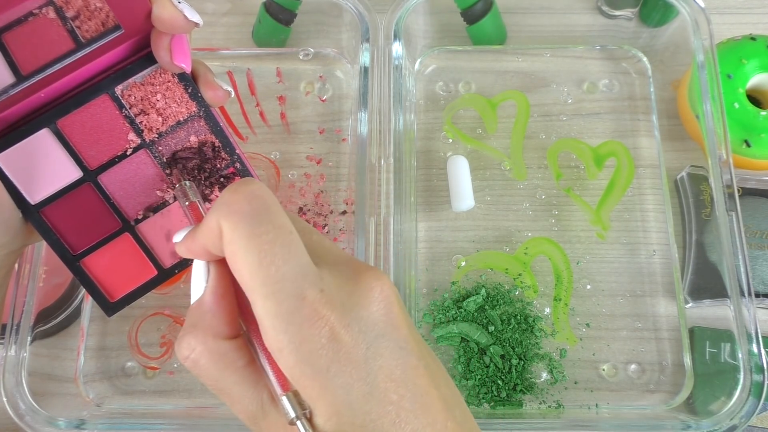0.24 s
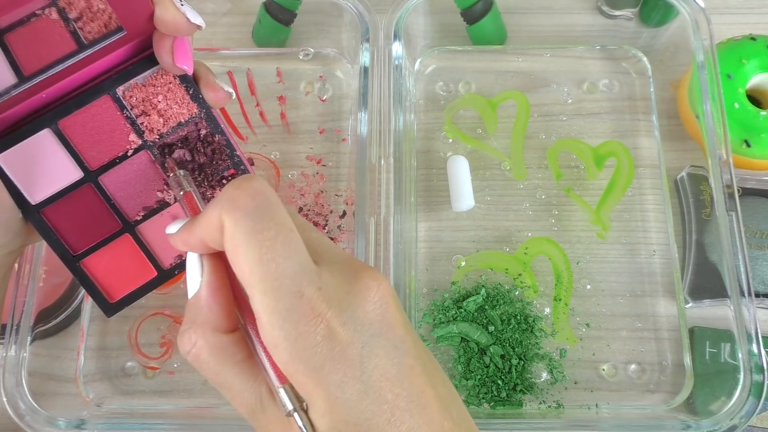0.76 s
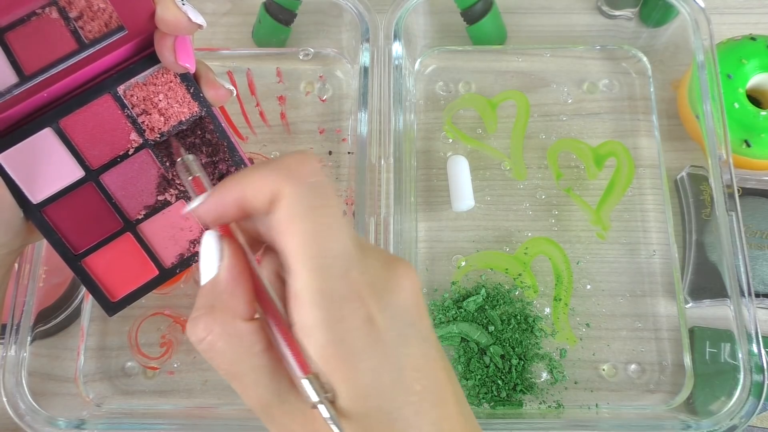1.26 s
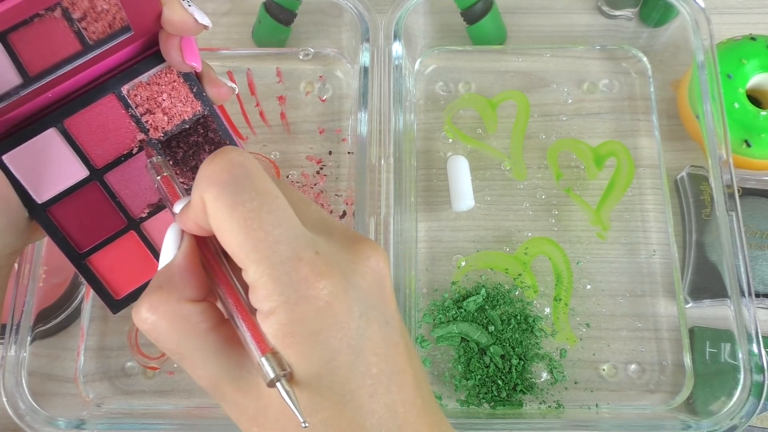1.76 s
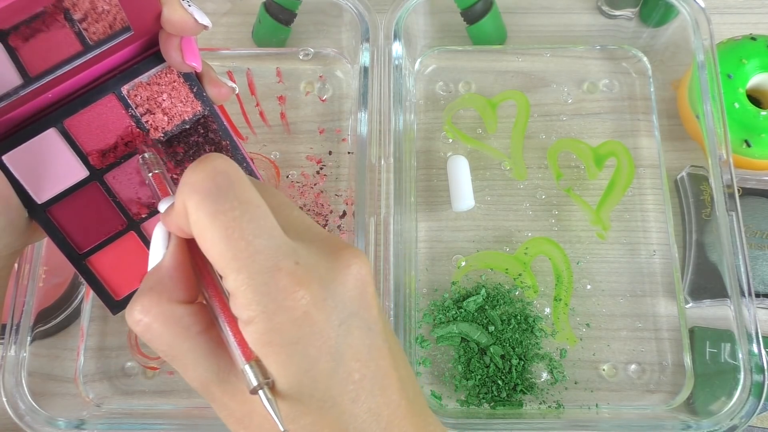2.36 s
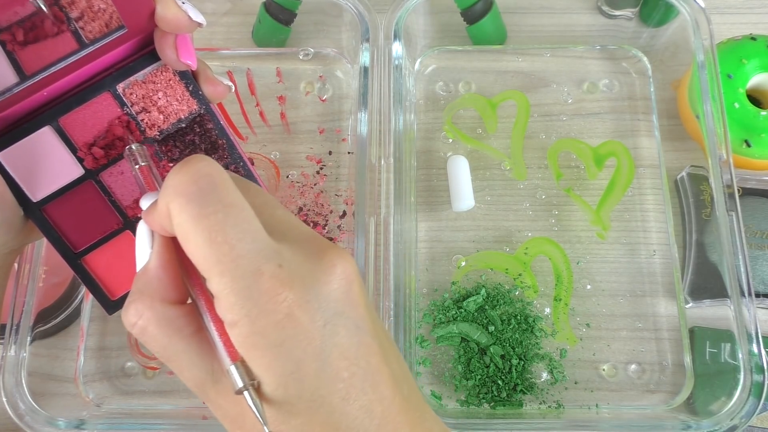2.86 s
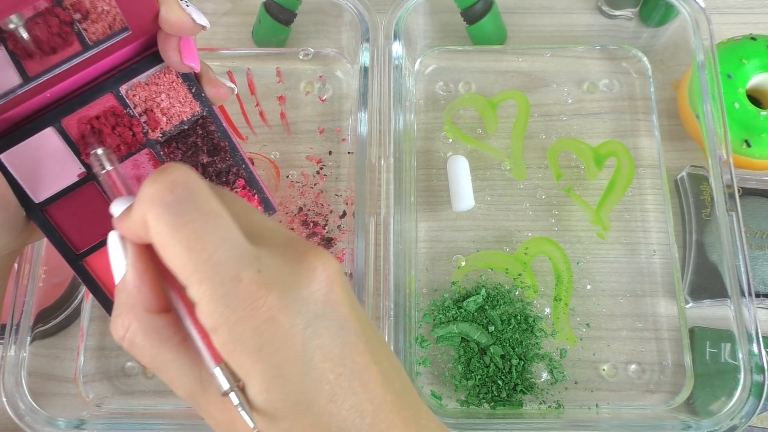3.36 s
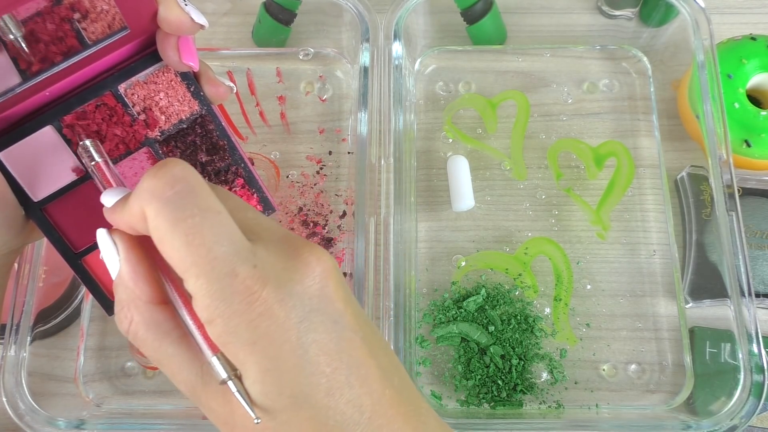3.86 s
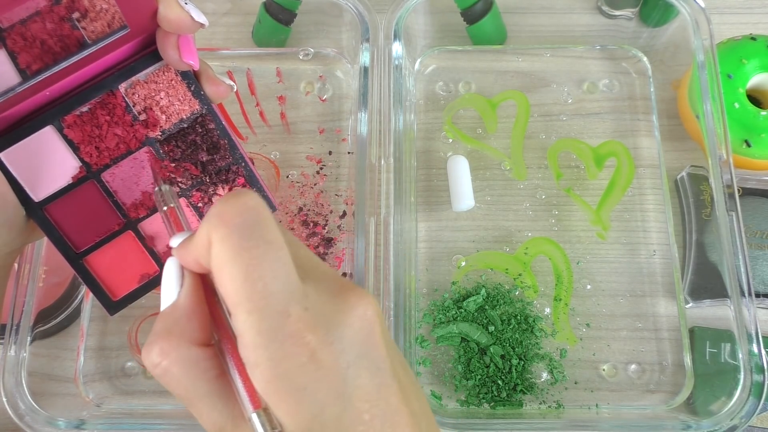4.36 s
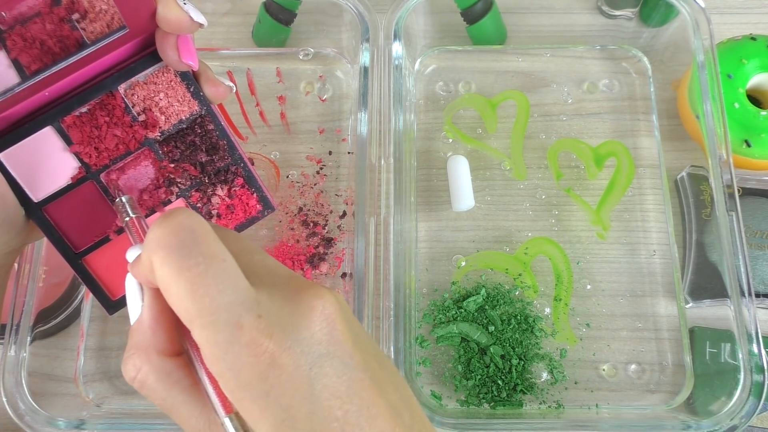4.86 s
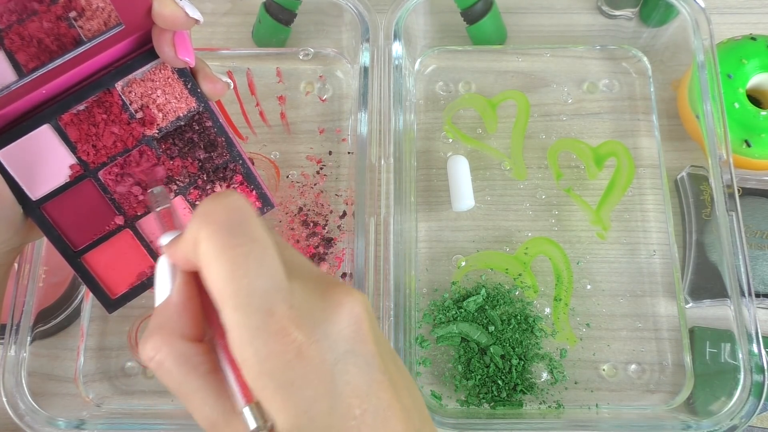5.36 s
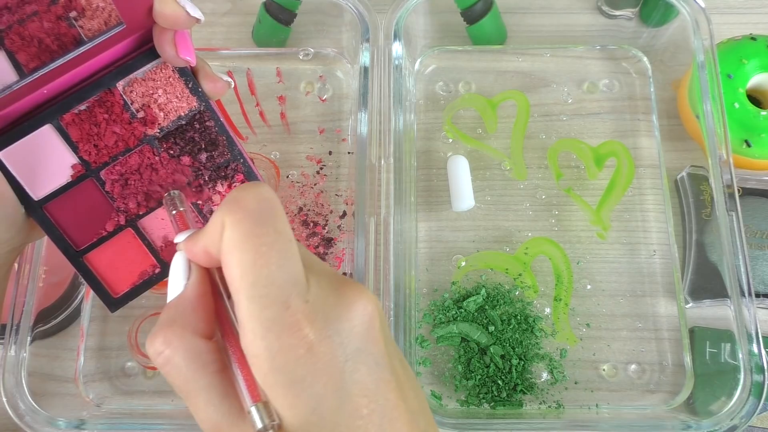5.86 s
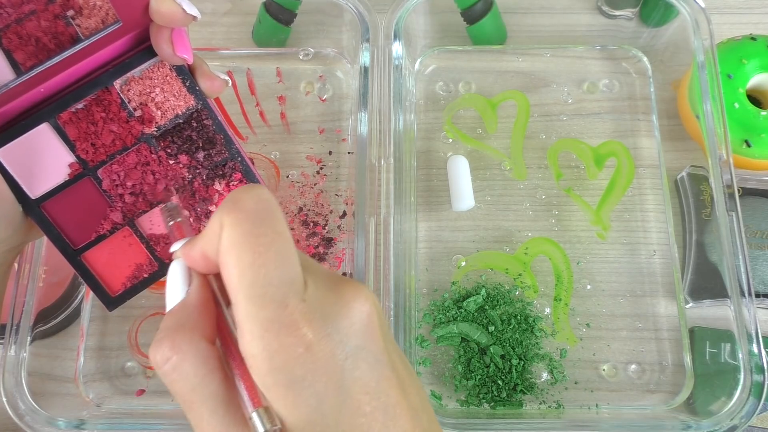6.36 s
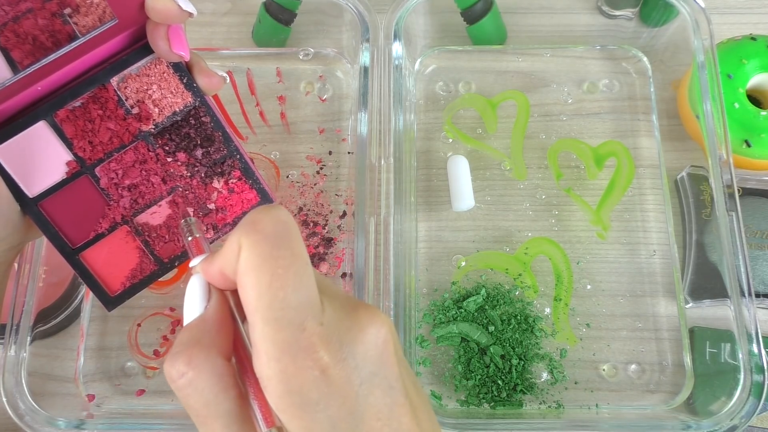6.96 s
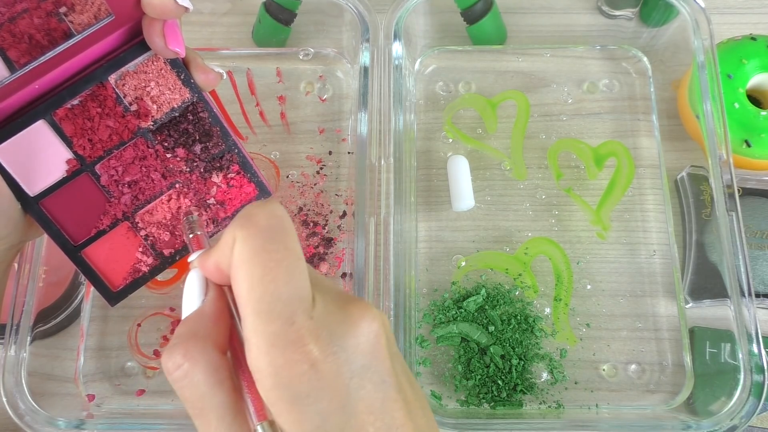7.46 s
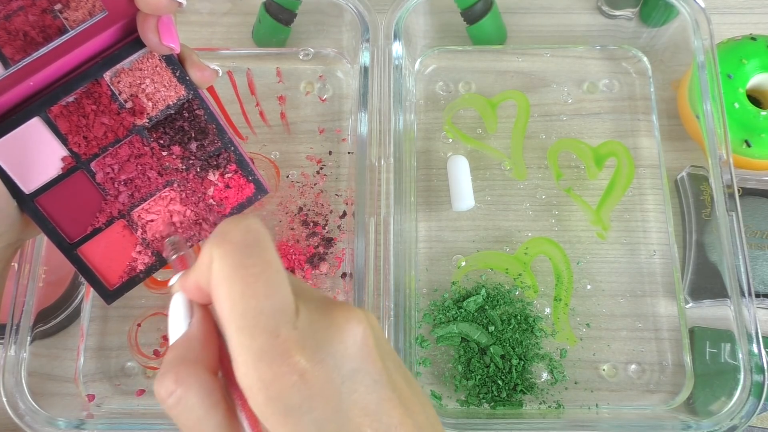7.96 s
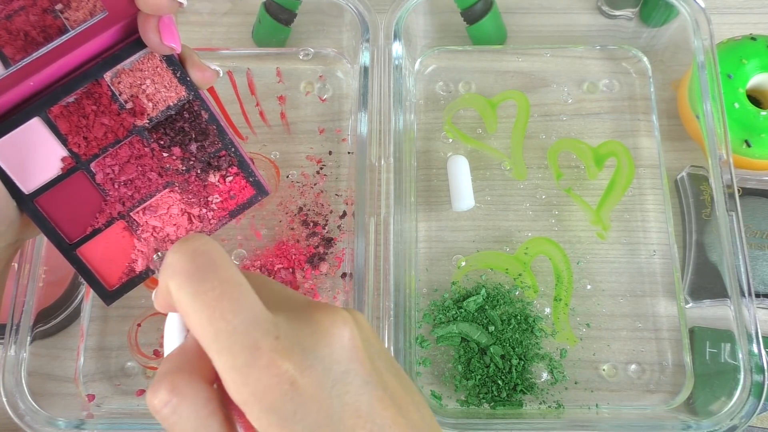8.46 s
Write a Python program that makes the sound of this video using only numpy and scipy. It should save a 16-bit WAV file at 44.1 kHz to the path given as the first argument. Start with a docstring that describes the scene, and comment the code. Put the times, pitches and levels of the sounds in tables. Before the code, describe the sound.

A metal tip scrapes and crumbles pressed powder in a small plastic palette in short gritty strokes, with a few hard taps over faint hum.

```python
"""Under the whole take lie faint hiss and a wavering hum, made of random spectra and resonated noise.
From the first instant a metal tip scrapes powder from a plastic palette held over a glass tray:
random grit, joined from 0.3 s by breaking chips, rings the palette; each push thuds through the table.
Hard taps fall near 1.4, 1.5, 4.1 and 4.3 s; the tip moves to new pans at 1.95, 4.6 and 7.05 s.
A stereo microphone stands close by; tray and hands return short reflections, the room a faint tail."""
import sys
import numpy as np
from scipy import signal
from scipy.io import wavfile
from scipy.ndimage import uniform_filter1d

SR = 44100
rng = np.random.default_rng(int(sys.argv[2]) if len(sys.argv) > 2 else 0)


def pcm_store(signal):
    """Save signal as 16-bit PCM."""
    levels = np.round(np.clip(np.atleast_2d(signal), -1, 1) * 32767)
    wavfile.write(sys.argv[1], SR, levels.astype(np.int16).T)


N = 384552
T = np.arange(N) / SR


def gain_of(db):
    """Amplitude factor of a level in dB."""
    return 10 ** (np.asarray(db) / 20)


def evened(x):
    """Scales a signal to rms 1."""
    return x / np.sqrt(np.mean(x ** 2) + 1e-20)


def read(points, hz):
    """Reads a curve between its points along a logarithmic frequency axis."""
    f, value = np.transpose(points)
    return np.interp(np.log(hz + 1), np.log(f + 1), value)


def add(mix, start_s, sound):
    """Adds a sound into the mix in place, cut off at the end of the mix."""
    part = mix[round(start_s * SR):][:len(sound)]
    part += sound[:len(part)]


def ring(x, hz, width):
    """One steep resonance, two equal poles in a row: complex output, its real part at gain 1 at centre."""
    r = np.exp(-np.pi * width / SR)
    pole = r * np.exp(2j * np.pi * hz / SR)
    two_poles = np.convolve([1, -pole], [1, -pole])
    return 2 * (1 - r) ** 2 * signal.lfilter([1], two_poles, x)


def drift(rate_hz):
    """Slow random wander of rms 1: low-passed noise drawn at every 64th sample."""
    b, a = signal.butter(2, rate_hz, fs=SR / 64)
    slow = evened(signal.lfilter(b, a, rng.standard_normal(N // 64 + 1)))
    return np.interp(np.arange(N) / 64, np.arange(len(slow)), slow)


def crack(rise_s, t60_s, crumbs_db):
    """A noise burst of force with a quieter, slower-dying trail of crumbs."""
    t = np.arange(900) / SR
    burst = gain_of(-60 * t / t60_s)
    crumbs = gain_of(crumbs_db - 60 * t / 0.048)
    return rng.standard_normal(len(t)) * (1 - np.exp(-t / rise_s)) * (burst + crumbs)


# spectrum of the background: f/Hz, relative density level/dB per Hz
HISS_SPECTRUM = [(25, -30), (45, -22.5), (70, -7.5), (100, -18), (160, -9), (240, -12.5), (500, -17),
                 (1000, -19), (3000, -19.5), (15700, -24)]
# its balance between the capsules: f/Hz, left-right level/dB
HISS_BALANCE = [(60, -24.5), (240, -2), (950, -0.5), (3770, 0), (15000, 0.5)]
# its likeness between the capsules: f/Hz, correlation (-1 to 1)
HISS_LIKENESS = [(60, -0.38), (380, 0.4), (2380, 0.12), (15000, -0.069)]
HISS_DB = -60.5  # rms over both capsules


def hiss():
    """Room rumble and microphone hiss as random short-time spectra, partly alike at the two capsules."""
    frames, hz = N // 512 + 5, np.fft.rfftfreq(2048, 1 / SR)
    a, b, c, d = rng.standard_normal((frames, 1025, 4)).T
    left, separate = a + 1j * b, c + 1j * d
    same = np.clip(read(HISS_LIKENESS, hz), -1, 1)[:, None]
    right = same * left + np.sqrt(1 - same ** 2) * separate
    level_db = read(HISS_SPECTRUM, hz) + np.outer([.5, -.5], read(HISS_BALANCE, hz))
    spectra = np.array([left, right]) * gain_of(level_db)[:, :, None]
    sound = signal.istft(spectra, nperseg=2048, noverlap=1536)[1][:, :N]
    return gain_of(HISS_DB) * evened(sound)


# fuzzy tones of the machine: f/Hz, width of each pole/Hz, level/dB before swell and capsule gains
HUM_TONES = [(128, 21, -69), (157.7, 11.5, -64.5), (205.6, 13, -77.5), (282.4, 14, -79.5)]
# slow swell of the whole hum: t/s, level/dB
HUM_SWELL = [(0.3, -2.5), (1.2, -0.5), (1.9, -5), (3.0, 5), (4.4, 0), (5.5, -1.5), (7.5, -2)]


def hum():
    """A distant machine: narrow bands of noise waver as tones that swell slowly, louder on the right."""
    out = np.zeros((2, N))
    swell_db = np.interp(T, *np.transpose(HUM_SWELL))
    for hz, width, db in HUM_TONES:
        near, other = (evened(ring(rng.standard_normal(N), hz, width).real) for _ in range(2))
        capsules = np.array([0.2 * near + .5 * other, 1.39 * near])
        out += gain_of(db + swell_db + drift(1.0)) * capsules
    return out


# one row a stroke or short scratch beside a tap or chip:
# start t/s, move to the second pressure t/s, hold t/s (1 ms is added to move and hold),
# landing pressure level/dB, second pressure level/dB,
# scratch of the tip level/dB, hollow ring of the palette level/dB, push into the table level/dB
STROKES = [(0.001, 0.02, 0.0034, -44.5, -45, -12, -3, -0.5),
           (0.198, 0.089, 0.004, -59.5, -49.5, -8.5, 2, 5), (0.471, 0.01, 0.065, -72, -44.5, -8, -2, 3.5),
           (0.696, 0.089, 0.0028, -60.5, -44, -9.5, -2, -1.5),
           (0.908, 0.052, 0.031, -55.5, -40, -14.5, -4, -10),
           (1.169, 0.059, 0.0085, -51.5, -35.5, -15.5, -2.5, -22),
           (1.357, 0.022, 0.004, -54, -45.5, -14, -6.5, -21.5),
           (1.524, 0.0035, 0.05, -54, -74.5, 9, 2, -16), (1.792, 0.008, 0.072, -57, -67, -9, 2.5, 4),
           (2.008, 0.1, 0.12, -69, -51, -6, -1, 1), (2.321, 0.051, 0.02, -57, -47, -4, -2, 1),
           (2.565, 0.066, 0.037, -67, -45, -6.5, 0.5, -4), (2.806, 0.044, 0.0075, -48, -43.5, -4, 1, -0.5),
           (3.017, 0.05, 0.035, -57, -45.5, -4.5, -1, -8), (3.227, 0.051, 0.005, -48.5, -42, -3, 1, -6),
           (3.438, 0.056, 0.0043, -51, -40.5, -6.5, -2, -8),
           (3.617, 0.056, 0.041, -60.5, -41, -5.5, -1.5, -8),
           (3.837, 0.077, 0.0076, -55.5, -35.5, -10, -6, -16),
           (4.048, 0.027, 0.017, -46, -31, -14.5, -4.5, -46),
           (4.282, 0.034, 0.007, -48.5, -42.5, -11, -8, -14),
           (4.734, 0.081, 0.073, -61.5, -65, -9.5, -10, 1.5),
           (4.806, 0.012, 0.071, -68, -48.5, -11.5, -3.5, -3),
           (5.027, 0.033, 0.04, -60, -42, -11.5, -4, -6), (5.237, 0.045, 0.035, -55, -45.5, -7, -2, 0),
           (5.45, 0.041, 0.013, -48, -47, -7, -1, 3), (5.647, 0.044, 0.047, -51.5, -49.5, -5, -3, 6),
           (5.871, 0.019, 0.031, -49.5, -45.5, -4.5, -1, 1), (6.071, 0.048, 0.022, -54.5, -45, -6, -0.5, 3),
           (6.281, 0.03, 0.02, -52.5, -38, -6.5, -3, -5.5),
           (6.487, 0.047, 0.033, -53.5, -39, -10, -6, -7.5),
           (6.692, 0.025, 0.028, -53.5, -36.5, -7, -4, -2),
           (6.825, 0.066, 0.004, -84, -58.5, -7.5, -4.5, 8),
           (7.249, 0.045, 0.01, -47.5, -47, -10.5, 0.5, -3),
           (7.445, 0.033, 0.029, -50.5, -44.5, -9.5, -2.5, 4.5),
           (7.642, 0.069, 0.021, -61, -41.5, -8, -1, 0.5), (7.843, 0.036, 0.033, -59, -38, -7, -4.5, 3.5),
           (8.069, 0.068, 0.004, -45.5, -49.5, -5, -0.5, 6.5),
           (8.252, 0.031, 0.046, -58, -43, -4.5, -3, 3.5), (8.457, 0.033, 0.062, -56.5, -45, -4.5, -3.5, 5),
           (8.652, 0.063, 0.082, -50, -39.5, -5, -5, 2)]
LAND_DB_PER_S, SAG_DB_PER_S, LIFT_DB_PER_S = 2000, 105, 538  # tip comes down, eases while held, lifts off


def pressure():
    """In each row pressure lands, moves to a second level, eases and lifts; loose powder trickles on."""
    press = np.zeros(N)
    for start, move, hold, landing_db, second_db, *_ in STROKES:
        second = start + move + 1e-3
        lift = second + hold + 1e-3
        eased_db = second_db - SAG_DB_PER_S * hold
        times = [start - 1, start, second, lift, lift + 1]
        levels = [landing_db - LAND_DB_PER_S, landing_db, second_db, eased_db, eased_db - LIFT_DB_PER_S]
        near = slice(max(round((start - .05) * SR), 0), round((lift + .2) * SR))
        press[near] += gain_of(np.interp(T[near], times, levels))
    r = np.exp(-1 / (0.15 * SR))  # the trickle dies with a time constant of 0.15 s
    return press + gain_of(-27.5) * signal.lfilter([1 - r], [1, -r], press)


def grip(order):
    """Gain of scratch (0), hollow ring (1) or push (2), held from 20 ms before one row to the next."""
    rows = np.array(STROKES)
    row = np.searchsorted(rows[1:, 0] - .02, T)
    return gain_of(rows[row, order - 3])


def grit(per_s, spread_db, clump_db, clump_hz):
    """Grains of very unequal size crush under the tip, in clumps as it sticks and slips."""
    size = gain_of(spread_db * np.minimum(rng.exponential(1, N), 4))
    grains = size * (rng.random(N) < per_s / SR) * rng.standard_normal(N)
    return evened(grains * gain_of(clump_db * drift(clump_hz)))


def scrape(press):
    """Fine grit and coarse cracks both follow the pressure on the powder, the cracks 6 dB weaker."""
    fine = grit(per_s=11000, spread_db=2.0, clump_db=3.0, clump_hz=51)
    coarse = grit(per_s=500, spread_db=2.0, clump_db=2.0, clump_hz=40)
    coarse = signal.oaconvolve(coarse, crack(rise_s=.0001, t60_s=0.0075, crumbs_db=-48))[:N]
    return press * (fine + gain_of(-6.0) * evened(coarse))


# modes of the palette: f/Hz, width of each pole/Hz, left-right level/dB, left lead/rad,
# level/dB when struck from pan 1, 2, 3, 4
PALETTE_MODES = [(923, 338, -11, 0.69, 4, 6.5, 7, 4.5), (1313, 204, -4.5, 0.22, 10, 7.5, 11.5, 6.5),
                 (1500, 277, -4, 0.091, 8.5, 15, 14, 15), (1766, 230, -12, 0.2, 8, 8, 10, 9),
                 (1933, 237, 7, 0.46, 0, 8.5, 5, 7.5), (2430, 590, -10, 0.3, -5, 1.5, 0, -8.5),
                 (2784, 270, 4.5, 0.71, 2.5, 6.5, 5.5, 3), (3056, 333, -6, 0.41, 1, 3.5, 4, 3),
                 (3778, 535, 0, 0.09, 6.5, 4.5, 4.5, 8), (4430, 870, -9.5, 0.74, 3, -3, -2.5, 0),
                 (5590, 1030, 4, 1, -9.5, -6, -25.5, -7.5)]
# ring of the tip and the pan rim: same columns
TIP_MODES = [(6300, 4000, -1.8, 2.23, 9.8, 6, 9.5, 6), (8580, 1320, 4, 1.1, 13.2, 8, 9.5, 11.5),
             (9910, 2700, -8.5, 1.6, 3.2, 3.5, 6, 3.5), (13800, 15700, 2.5, 2.15, 2.7, -3, -3.5, -1.5)]
# the tip moves to the next pan: t/s
PAN_CHANGES = [1.95, 4.6, 7.05]
HOLLOW_HZ = 2100  # modes below this make the hollow ring


def modes(force, table, hollow):
    """Pan and wandering tip set how hard each mode is driven; each reaches the capsules differently."""
    pan, out = np.searchsorted(PAN_CHANGES, T), np.zeros((2, N))
    for k, (hz, width, side_db, lead, *pan_db) in enumerate(table):
        drive = force * gain_of(pan_db)[pan] * gain_of(2.62 * drift(14.4))
        if hz < HOLLOW_HZ:
            drive = drive * hollow
        z = (-1) ** k * ring(drive, hz, width)  # neighbours swing in opposite sense and leave dark gaps
        out[0] += gain_of(side_db / 2) * (z * np.exp(1j * lead)).real
        out[1] += gain_of(-side_db / 2) * z.real
    small_plate = signal.butter(1, 500, "high", fs=SR, output="sos")  # it radiates little bass
    return signal.sosfilt(small_plate, out)


LIGHT_TOUCH_DB = -56  # below this pressure the tip only brushes the powder and the hollow ring fades


def hollow_ring(press):
    """The palette rings hollow by the gain of each row, less under a light touch."""
    touch = (press + gain_of(-67)) / (press + gain_of(LIGHT_TOUCH_DB))
    return grip(order=1) * np.sqrt(touch)


# modes of the table under the tray: f/Hz, width of each pole/Hz, level/dB before the right gain
TABLE_MODES = [(66.6, 24.5, -11), (83, 78, -4), (443, 510, -5.5)]


def table_thud(body):
    """One-sided push and trembling hand shake the table: bass near opposite phase, stronger right."""
    load = grip(order=2) * abs(body)
    held = uniform_filter1d(load, size=800)
    push = load + held * drift(155)
    left = push + 0.59 * held * drift(150)  # the left capsule stands on another part of the table
    feet = np.array([left, push])
    z = sum(gain_of(db) * ring(feet, hz, width) for hz, width, db in TABLE_MODES)
    return np.array([(z[0] * np.exp(2.4j)).real, gain_of(6.5) * z[1].real])


def tray(x):
    """Short bright reflections from tray and hands that change as the hand moves, then a faint room tail."""
    t = np.arange(9000) / SR
    shape = (3, 2, len(t))  # two reflection patterns and the room, each for two capsules
    tails = rng.standard_normal(shape) * (rng.random(shape) < .15) * (t > .0004)
    tails *= gain_of(-60 * t / np.array([.02, .02, .2])[:, None, None])  # seconds to fall by 60 dB
    tails *= gain_of([-4.0, -4.0, -16.0])[:, None, None] / np.linalg.norm(tails, axis=2, keepdims=True)
    b, a = signal.butter(1, 3500, "high", fs=SR)
    tails[:2] = signal.lfilter(b, a, tails[:2])  # small faces return only short waves
    turn = 2 * np.pi * 1.7 * T + 1.35 * drift(2.8)  # the moving hand fades between the two patterns
    feeds = [np.cos(turn), np.sin(turn), 1]
    return x + sum(signal.oaconvolve(x * f, tail, axes=1)[:, :N] for f, tail in zip(feeds, tails))


# chips that break off the cake: t/s, force level/dB
CHIPS = [(0.3004, -31), (0.4898, -25.5), (0.5377, -33.5), (0.706, -36.5), (0.775, -30.5), (0.9416, -28),
         (1.361, -34), (1.4803, -43), (1.7859, -46.5), (1.8321, -43.5), (2.0445, -44.5), (2.081, -47),
         (2.1759, -37), (2.3353, -38.5), (2.3666, -31), (2.8107, -27), (3.031, -35), (3.2316, -28.5),
         (3.273, -30), (3.485, -53), (3.6687, -34), (2.133, -39), (3.117, -36), (4.817, -40.5),
         (5.517, -36), (5.656, -32.5), (5.737, -36.5), (5.874, -33), (5.9355, -27.5), (6.0808, -30),
         (6.1585, -29), (6.3038, -28.5), (6.7036, -41), (6.899, -42), (7.170, -49), (7.253, -37),
         (7.7176, -49), (7.864, -34.5), (8.0699, -31), (8.1374, -28.5), (8.2797, -29), (8.333, -25.5),
         (8.4713, -28), (8.5462, -31.5), (8.6759, -29)]


def breaking_chips():
    """Each chip gives one short crack of force as it breaks off the cake."""
    force = np.zeros(N)
    for s, db in CHIPS:
        add(force, s, gain_of(db) * crack(rise_s=0.00032, t60_s=0.006, crumbs_db=-10.0))
    return force


# hard taps of the tip on the pan: t/s, force level/dB, brightness of the bare snap level/dB
TAPS = [(1.3832, -3.5, -19), (1.5205, -15, 5), (4.0785, -9, -21), (4.3173, -2.5, -3)]


def hard_taps():
    """Very short bursts of force on the palette, and their bare snap from a broad resonance at 7 kHz."""
    force, snap = np.zeros(N), np.zeros(N)
    for s, db, bright_db in TAPS:
        tap = gain_of(db) * crack(rise_s=.00005, t60_s=0.0011, crumbs_db=-29.0)
        add(force, s, tap)
        add(snap, s, gain_of(bright_db) * tap)
    return force, ring(snap, hz=7000, width=6500).real


def scene():
    """Scrape, chips and taps drive palette, tip and table, over the hiss and hum of the place."""
    press = pressure()
    scraping, chips = scrape(press), breaking_chips()
    taps, snap = hard_taps()
    tip = grip(order=0) * (scraping + gain_of(-8.0) * chips)  # chips are duller than grit
    body = scraping + chips + taps
    palette = modes(body, PALETTE_MODES, hollow_ring(press))
    return hiss() + hum() + tray(palette + modes(tip, TIP_MODES, 1) + snap) + table_thud(body)


EDGE_HZ, OFFSET = 15780, -.0009  # upper band limit; steady offset of the converter (full scale 1)


def record(dry):
    """The capsules lose the deepest bass; then the band limit and a small steady offset."""
    band_limit = signal.firwin(1023, EDGE_HZ, window=("kaiser", 9), fs=SR)
    thin = signal.sosfilt(signal.butter(4, 46, "high", fs=SR, output="sos"), dry)
    return signal.oaconvolve(thin, band_limit[None], "same") + OFFSET


dry = scene()
out = record(dry)
pcm_store(out)
```